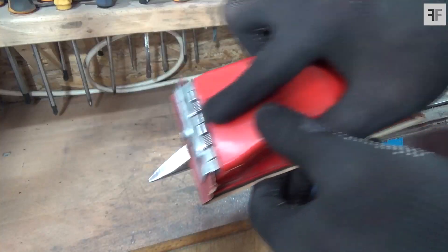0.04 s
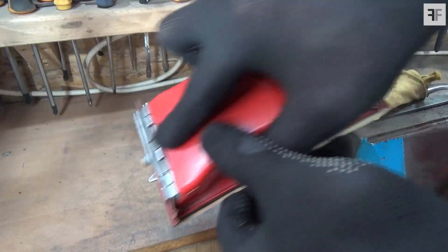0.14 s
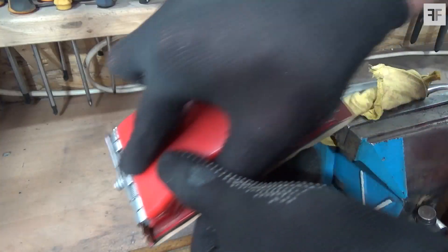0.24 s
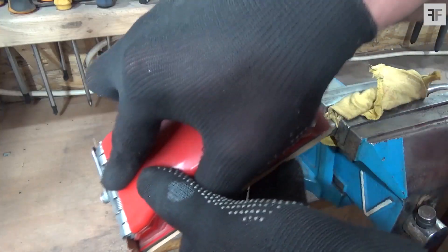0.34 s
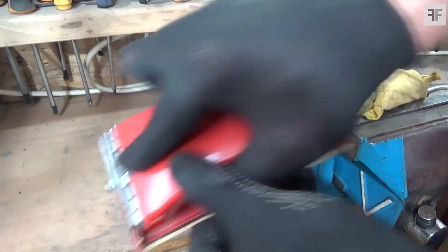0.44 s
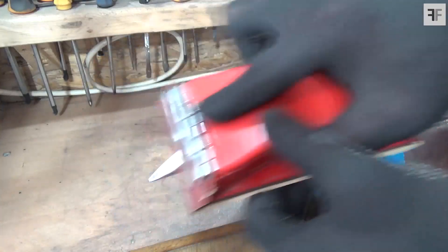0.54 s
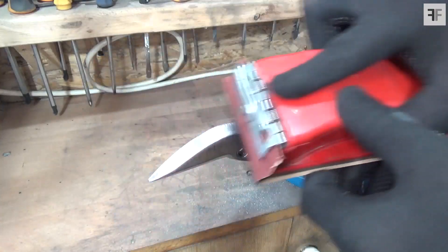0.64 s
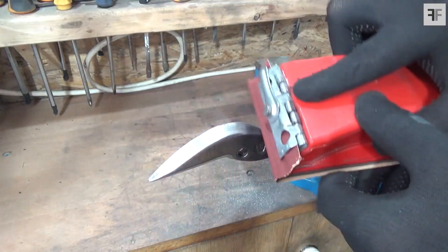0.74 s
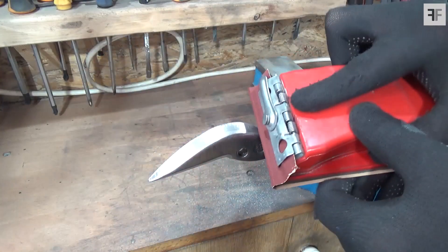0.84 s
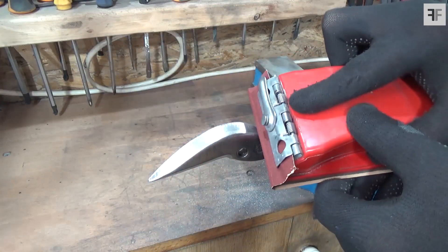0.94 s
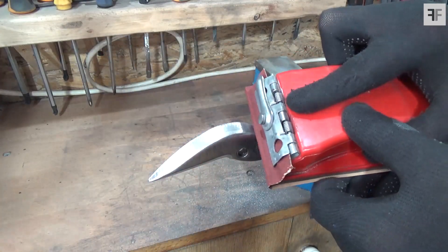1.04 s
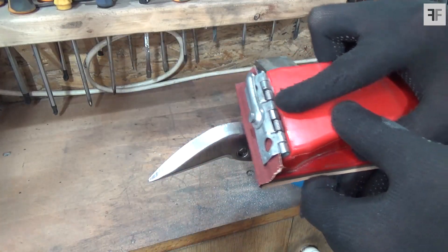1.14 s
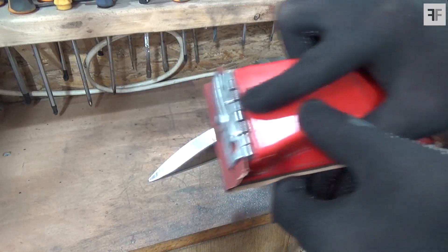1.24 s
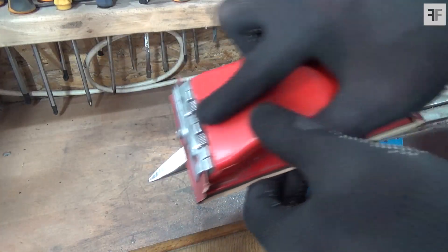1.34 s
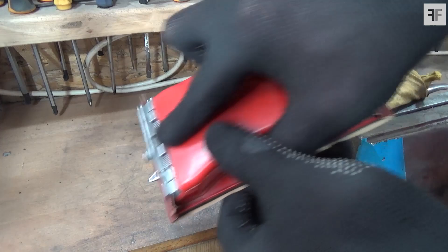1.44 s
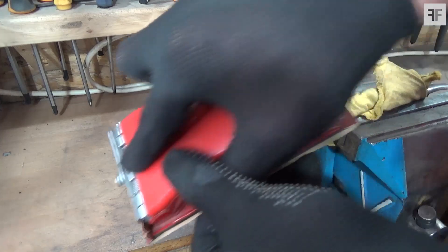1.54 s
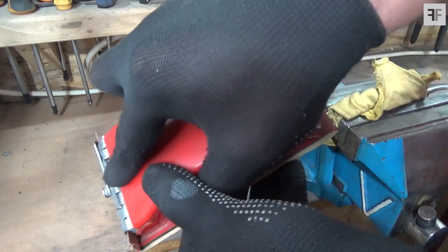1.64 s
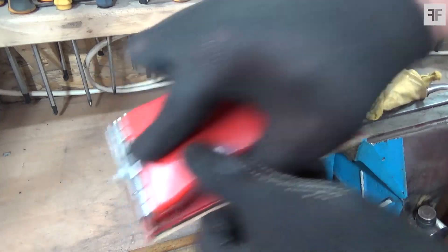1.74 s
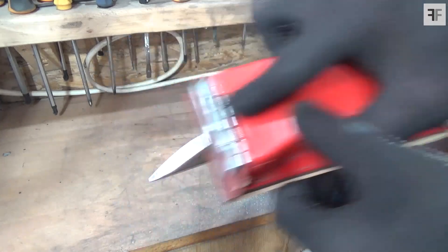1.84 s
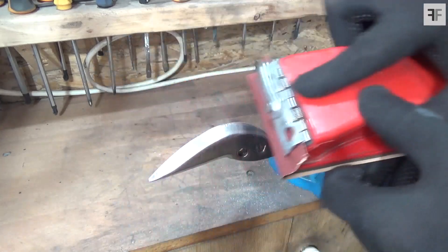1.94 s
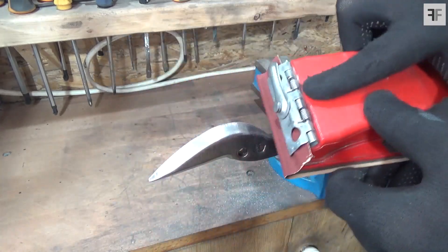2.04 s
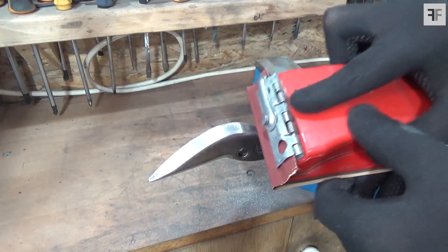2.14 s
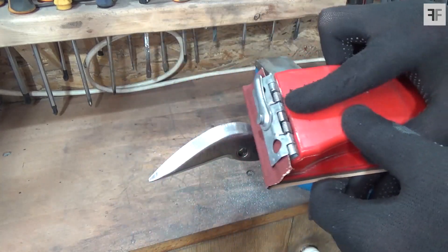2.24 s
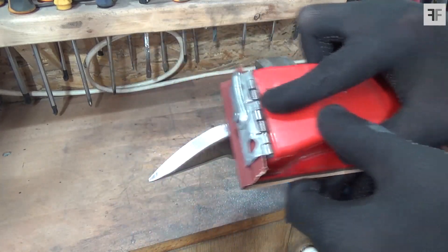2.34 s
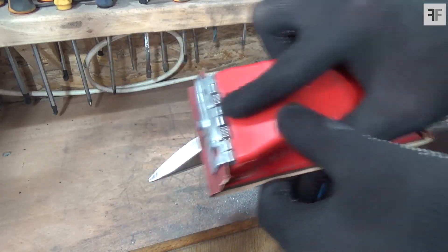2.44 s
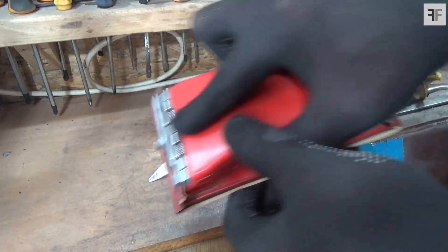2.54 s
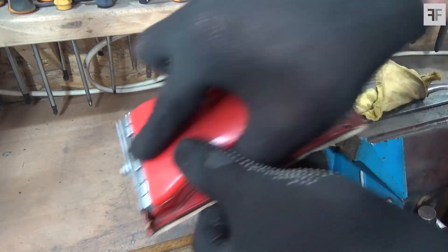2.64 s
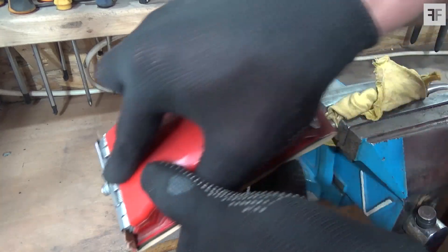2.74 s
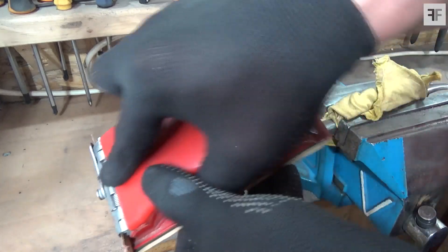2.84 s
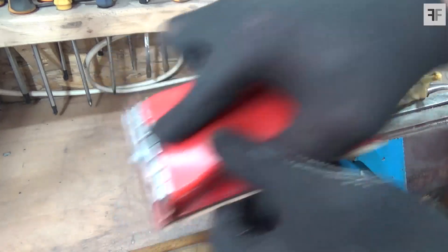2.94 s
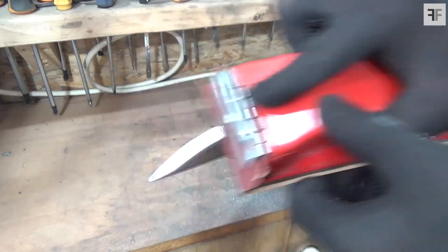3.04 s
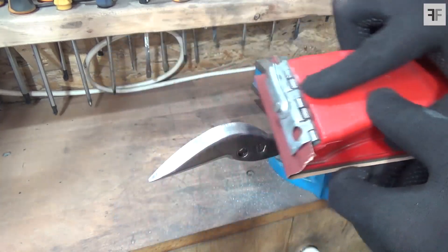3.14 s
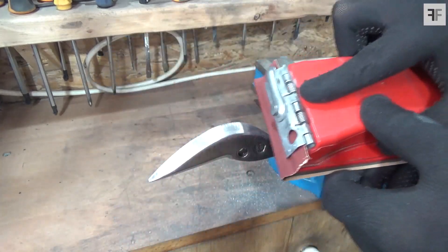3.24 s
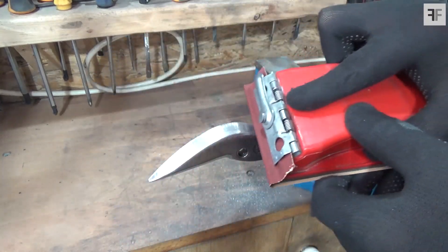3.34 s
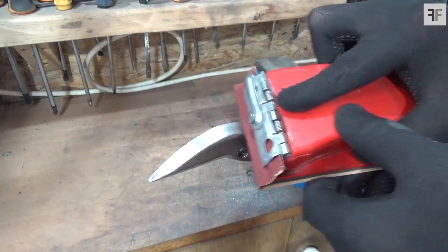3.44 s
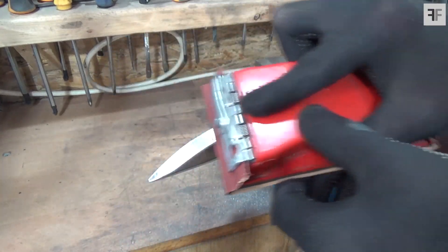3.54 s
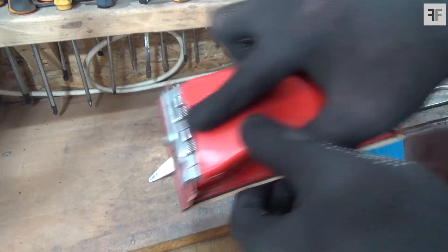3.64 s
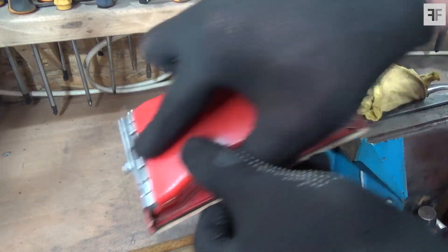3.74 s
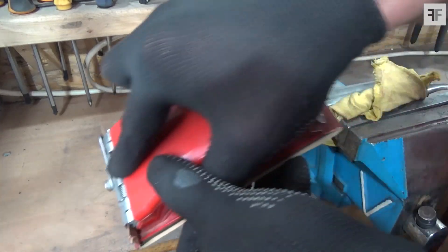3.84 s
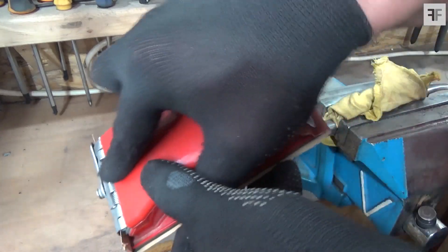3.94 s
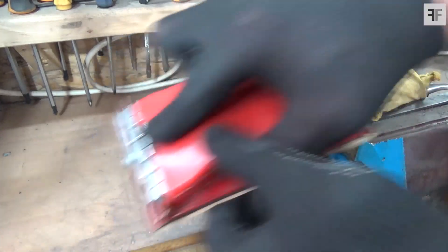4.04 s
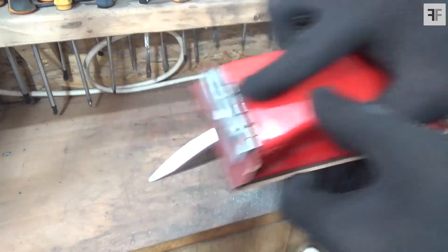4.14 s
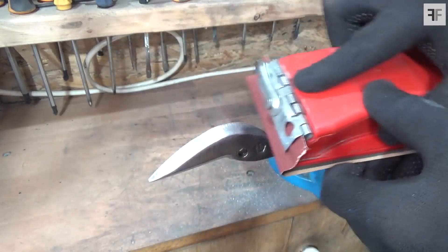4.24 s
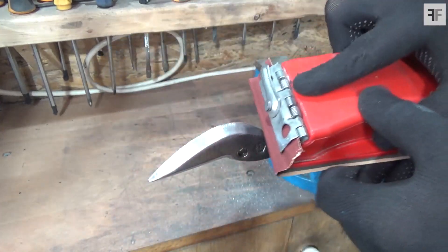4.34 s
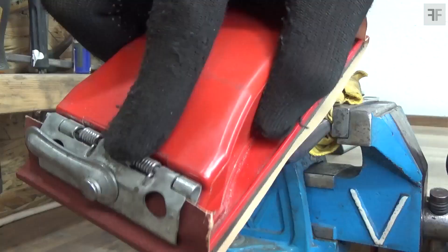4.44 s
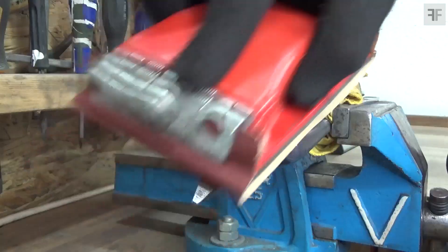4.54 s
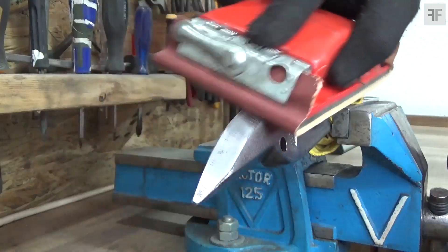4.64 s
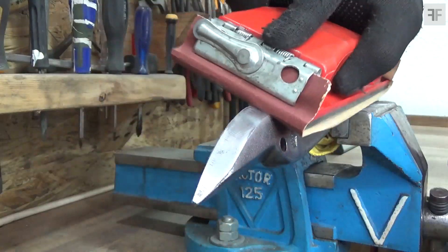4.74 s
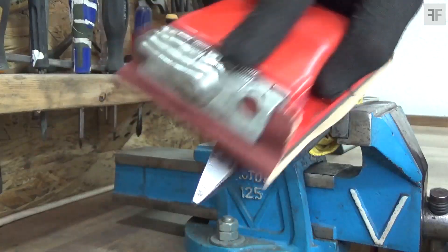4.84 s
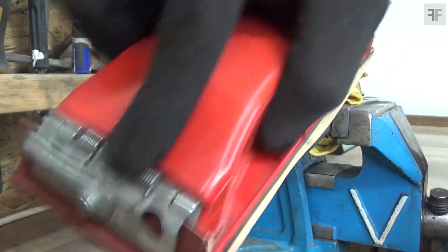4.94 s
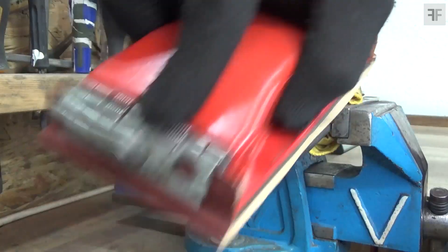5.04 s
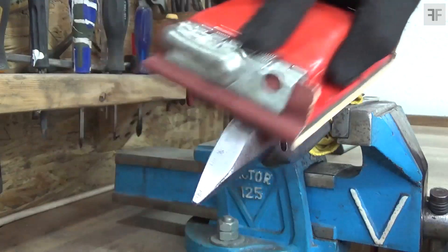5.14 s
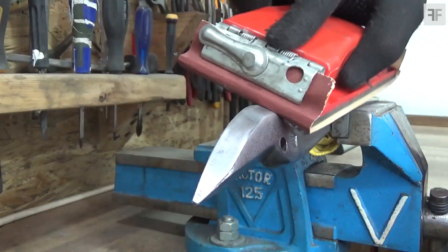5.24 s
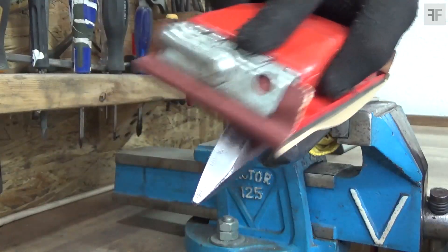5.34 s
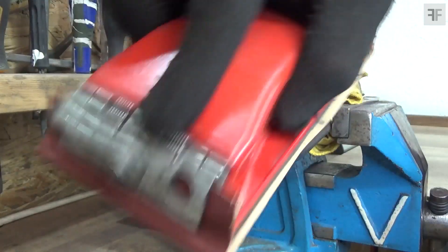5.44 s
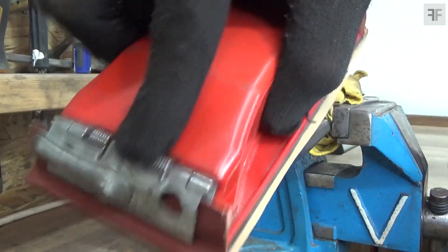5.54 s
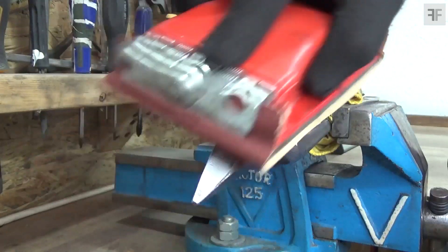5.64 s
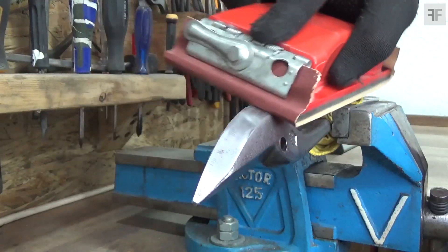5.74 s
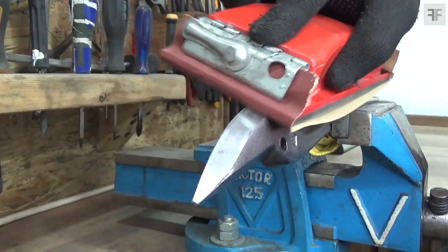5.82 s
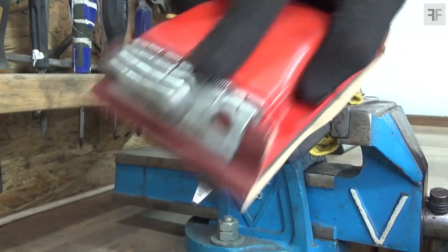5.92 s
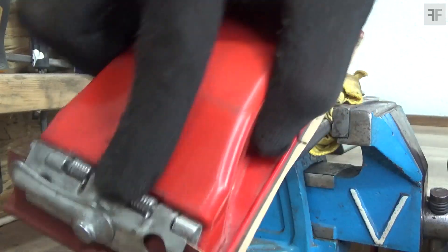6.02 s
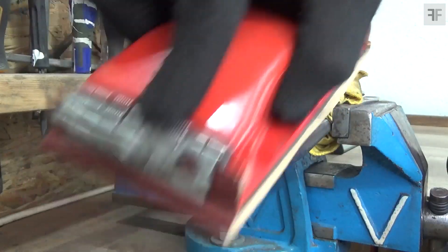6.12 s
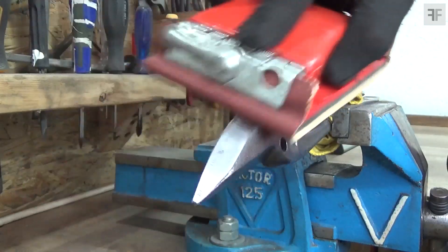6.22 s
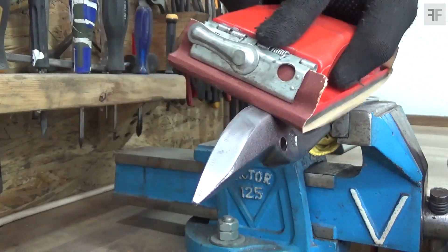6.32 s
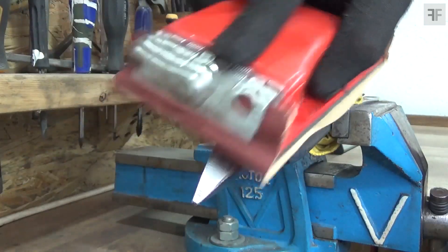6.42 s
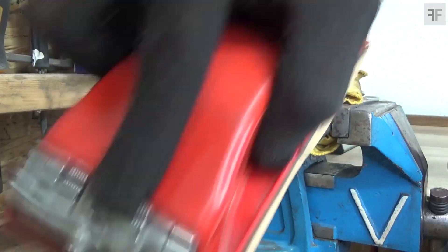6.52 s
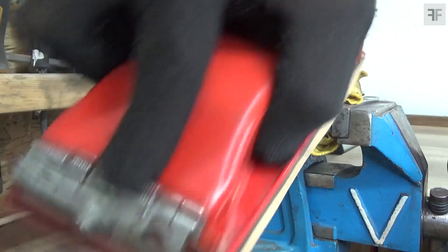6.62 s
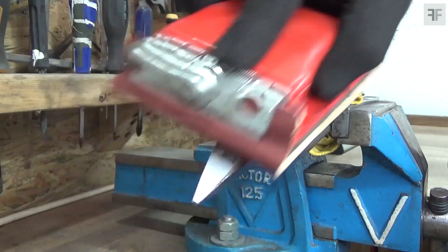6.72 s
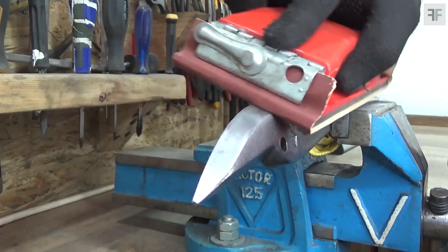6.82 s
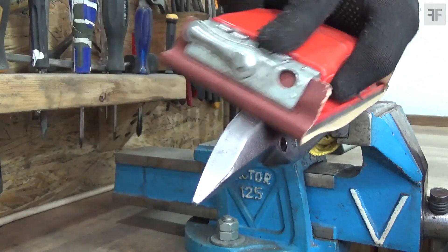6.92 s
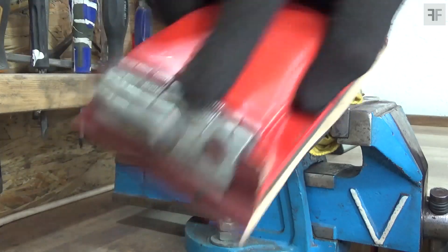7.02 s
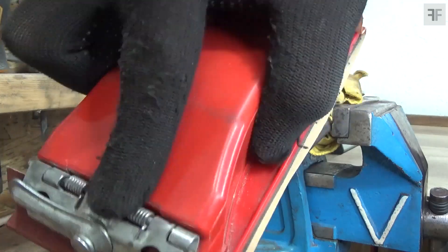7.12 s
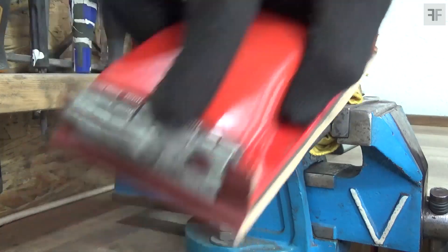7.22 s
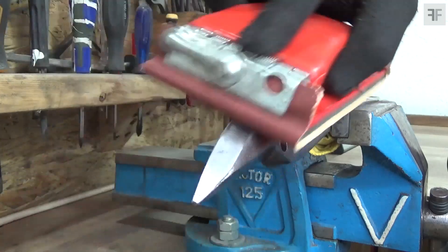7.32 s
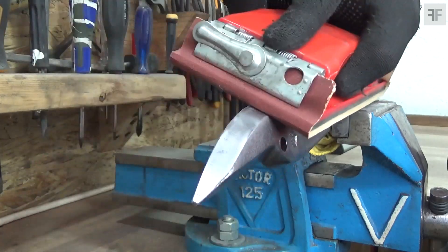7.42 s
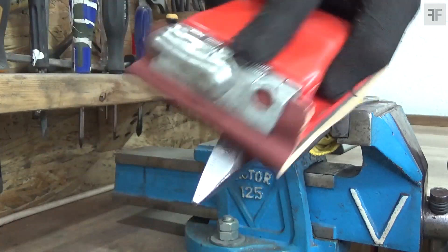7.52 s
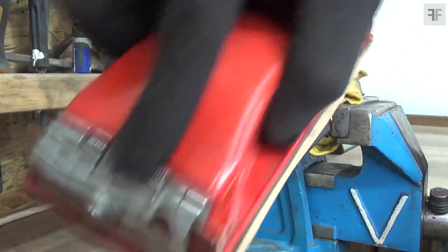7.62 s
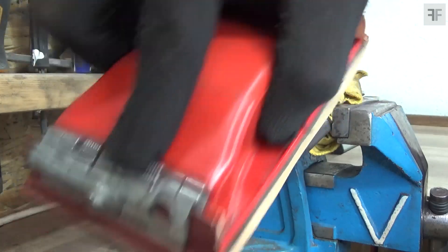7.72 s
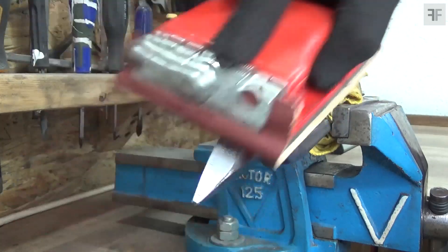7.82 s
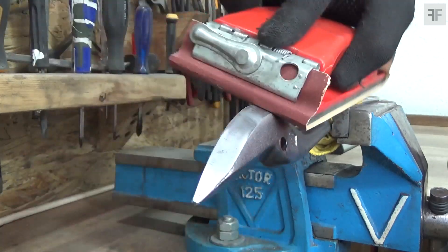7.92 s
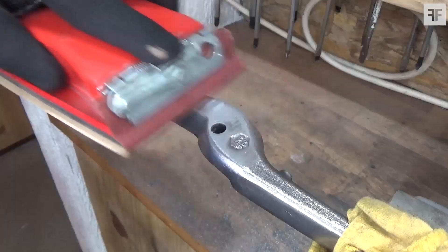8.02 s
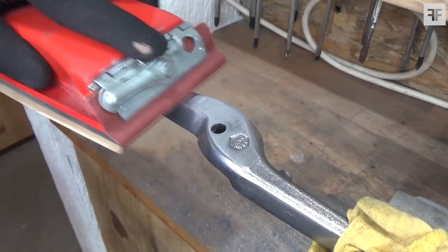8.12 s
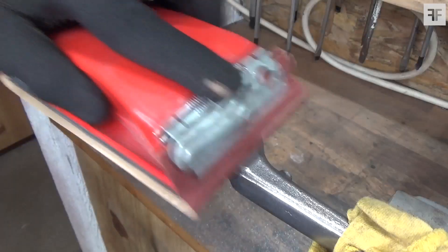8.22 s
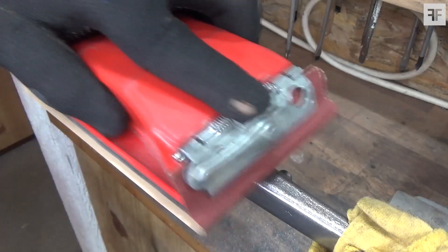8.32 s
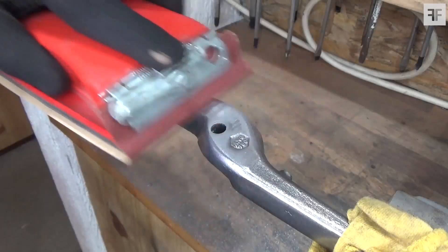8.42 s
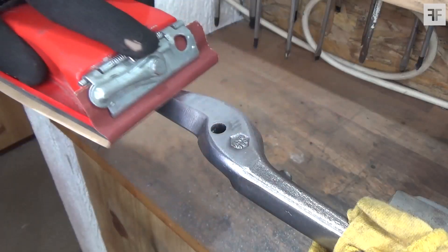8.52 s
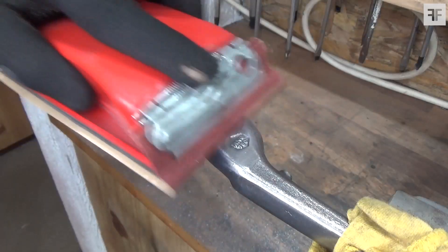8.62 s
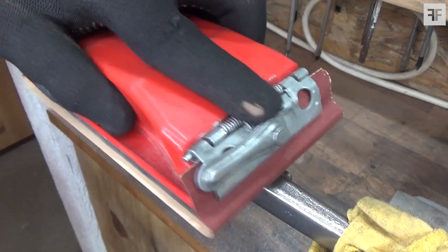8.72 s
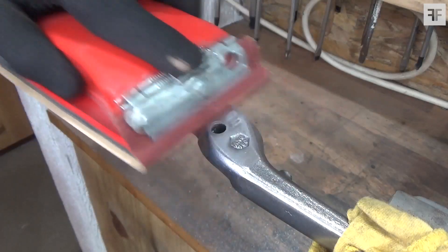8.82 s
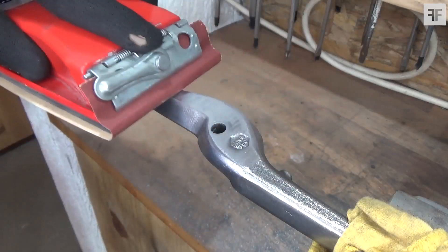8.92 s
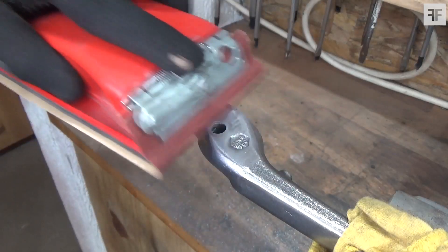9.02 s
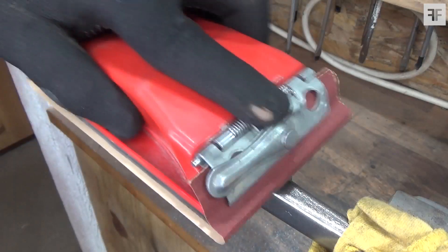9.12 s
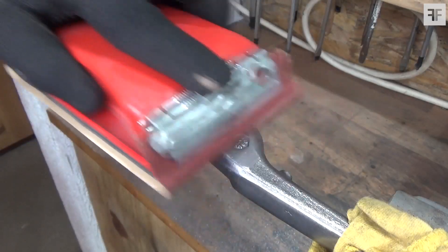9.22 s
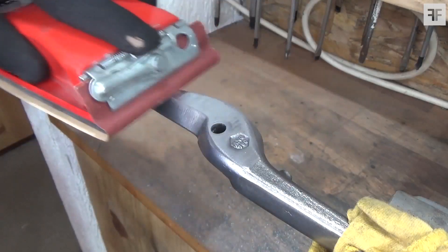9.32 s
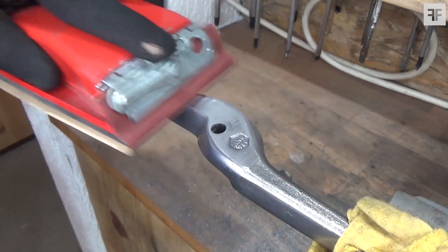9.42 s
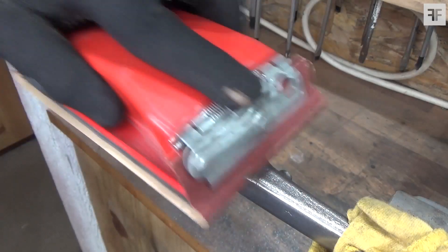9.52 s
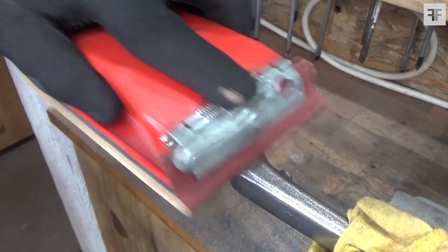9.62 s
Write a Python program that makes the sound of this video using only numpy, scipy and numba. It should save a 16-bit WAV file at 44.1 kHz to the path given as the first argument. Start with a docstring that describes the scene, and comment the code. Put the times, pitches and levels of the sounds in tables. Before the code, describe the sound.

Abrasive paper on a hollow plastic block scrapes bare steel, heard close with a short, dry room around it. Long bright hissing strokes with a hollow low hum near their ends alternate with quiet pauses, small knocks and paper ticks. After a few seconds the strokes join into rapid, regular to-and-fro scrubbing with metallic and papery resonances, nearly stopping at each turn, then speed up a little and continue to the end.

```python
"""Sanding a pruner blade

A plastic sanding block rasps on the steel blade of a pruner clamped in a vice, close up in a small workshop.
Four long pushes come first (one already under way), then quick to-and-fro strokes on the edge and on the neck.
Ticks and hiss of grit drive resonances of blade, block and paper, chosen by where the pad touches.
The hollow block hums on the long pushes; filtered noise makes dry knocks, rustling cloth and still air.
Scattered echoes add the room."""
import sys
import numpy as np
from scipy import signal
from scipy.fft import rfft, irfft, next_fast_len
from scipy.io import wavfile
from scipy.ndimage import uniform_filter1d, map_coordinates
from numba import njit

SR = 44100
rng = np.random.default_rng(int(sys.argv[2]) if len(sys.argv) > 2 else 0)


def to_wav(s):
    """Save 16-bit WAV."""
    ch = np.atleast_2d(s).T  # columns
    pcm = np.round(np.clip(ch, -1, 1) * 32767)  # PCM
    wavfile.write(sys.argv[1], SR, pcm.astype(np.int16))


N = 426447
TIME = np.arange(N) / SR  # s

# "place" is the contact point in the stroke: 0 to 1 along a push, 1 to 2 back along a return.

# Long pushes; force level at the bite:
# block_sets_off_s, pad_bites_s, lifts_off_s, rise_s, easing_s, level_db, treble_db
PUSHES = [(-0.245, -0.2, 0.462, 0.1, 0.07, -30.8, -1), (1.075, 1.04, 1.745, 0.125, 0.09, -31.5, -0.5),
          (2.2, 2.309, 2.91, 0.046, 0.12, -31.8, -0.5), (3.37, 3.37, 4.03, 0.165, 0.16, -31, -1)]
# Light brushes of the pad on the blade: start_s, length_s, peak_level_db
BRUSHES = [(0.91, 0.095, -59.5), (0.99, 0.07, -60), (1.773, 0.04, -52), (2.17, 0.12, -62),
           (2.238, 0.08, -42), (2.938, 0.052, -42.5), (3.305, 0.12, -57), (3.415, 0.045, -43),
           (4.16, 0.17, -65), (4.41, 0.13, -67)]
# Quick strokes, push and return in turn, each lasting until the next:
# start_s, braking_s, level_db, blade_ring_db, treble_db
EDGE_STROKES = [(4.558, 0.04, -33, 0, 0), (4.827, 0.042, -32.2, 0, 0), (5.076, 0.03, -32.2, 2, 0),
                (5.348, 0.045, -32.2, 1, 0), (5.622, 0.04, -33.3, -2, 0), (5.886, 0.03, -32.9, 0, 0),
                (6.152, 0.034, -33.2, 0, 0), (6.413, 0.028, -32.5, -1, 0), (6.678, 0.036, -32.4, -1, 0),
                (6.967, 0.03, -31.7, 0, 0), (7.234, 0.045, -33.4, -4, 0), (7.527, 0.036, -32.1, -1, 0),
                (7.785, 0.03, -33.4, -3, 0)]
NECK_STROKES = [(8.031, 0.043, -32, -1, 0), (8.188, 0.035, -32, -1, 0), (8.39, 0.045, -31.8, -1, 0),
                (8.606, 0.025, -32.2, 0, 0), (8.811, 0.055, -31.7, -1, 0), (9.027, 0.042, -31.5, 0, 0),
                (9.243, 0.045, -32, -1, 0), (9.455, 0.037, -31.2, 0, 0)]
# Timing shared by all pushes (first row) and all returns (second row): rise_s, rest_before_next_s
EDGE_TIMING = [(0.026, 0.006), (0.013, 0)]
NECK_TIMING = [(0.022, 0), (0.021, 0)]
# Broad colour of the rubbing: frequency_hz, level_db
FLAT_COLOUR = [(30, -46.5), (100, -43), (185, -25.5), (480, -14), (780, -10.5), (1050, -7.5), (1400, -4.5),
               (2000, -2), (3200, -2.5), (4700, -2), (7500, 1), (10000, -4), (13000, -9.5), (15800, -17.5)]
EDGE_COLOUR = [(30, -48), (65, -41), (105, -45), (180, -25), (450, -13), (760, -14.5), (1050, -2),
               (1450, -5.5), (2000, -3), (3300, 1.5), (4800, 1), (7500, -0.5), (10000, -6), (13000, -12.5),
               (15800, -18)]
NECK_COLOUR = [(30, -55), (90, -48), (180, -30.5), (450, -17), (760, -13.5), (1100, -8.5), (1450, -13.5),
               (2000, -3.5), (3300, -3), (4800, 0), (8000, 1), (10000, -3.5), (13000, -10.5), (15800, -20)]
# Keenness of the paper along the pad, for each way of holding it: place, treble_db
PAD_KEENNESS = [(0, -1), (.29, -9), (.4, 5.5), (.55, -2), (.7, -5), (.85, -18), (1, 1)]
EDGE_KEENNESS = [(0, 5), (.38, 6.5), (.62, 13.5), (.9, 7), (1.1, 5.5), (1.55, 4), (2, 5)]
NECK_KEENNESS = [(0, 1), (.8, 2.5), (1.05, -6), (1.5, 3), (2, 0)]
# Resonances of blade and block: pitch_hz, width_hz, lift_db, best_place, reach_in_place
FLAT_MODES = [(185, 30, 3, .75, .4), (990, 170, 7, 0.19, 0.35), (1155, 33, 13.5, 0.85, 0.25),
              (1225, 65, 14.5, 0.72, 0.42), (1790, 190, 11.5, 0.6, 0.36), (2260, 140, 6, 0.74, .25),
              (2735, 130, 12, 0.5, 0.38), (3370, 390, 3, 0.42, 0.3), (3950, 200, -1, 0.5, 0.25),
              (3720, 150, 7, 0.16, 0.11), (6230, 260, 3, 0.44, 0.16), (9250, 410, -2, 0.64, 0.43)]
EDGE_MODES = [(338, 36, 14, 0.95, 0.3), (643, 32, 20, 0.45, 0.95), (865, 46, 14.5, 1.12, 0.18),
              (1290, 300, 14.5, 0.13, 0.097), (1170, 370, 13.5, 1.906, 0.16), (1740, 92, 12.5, 1.5, 0.7),
              (1947, 140, 12.5, 1.64, 0.63), (2320, 196, 11, 1.79, 0.69), (2910, 87, 3, 0.12, 0.37),
              (7400, 690, 1, 1.74, 0.22), (3220, 1100, 9, 1.04, 0.05), (3880, 460, 8, 0.78, 0.22),
              (5970, 500, 1, 1.1, 1.2), (7050, 700, 0, 0.8, 3)]
NECK_MODES = [(335, 55, 3.5, 1.2, 1.3), (632, 45, 18.5, 0.88, 0.36), (885, 80, 11, 1.12, 0.18),
              (1170, 106, 3.5, 0.46, 1.7), (1790, 200, 11.5, 1.86, 0.18), (2480, 140, 7, 1.12, 0.4),
              (3030, 160, 1.5, 0.5, 0.83), (4450, 560, 6, 1.16, 0.17), (5650, 200, 9, 1.05, 0.5),
              (5930, 500, 6.5, 1.4, 1.3), (8300, 2600, 0, 0.42, 0.2)]
# Pad resonances sliding with the length beyond the contact, one list for each: place, pitch_hz, lift_db
FLAT_SLIDES = [
    [(0, 5900, -12), (.15, 5900, 2), (.21, 5850, 5.5), (.26, 5000, 6.5), (.3, 4400, 2), (.38, 4000, -14),
     (1, 4000, -30)],
    [(0, 3800, -12), (.19, 3700, 1), (.26, 3350, 8), (.3, 2850, 13), (.39, 2740, 9), (.5, 2600, -8),
     (.75, 1630, -20), (.88, 1100, 12), (1, 1000, -5)],
]
EDGE_SLIDES = [
    [(0, 2260, -20), (.15, 2400, 17), (.3, 940, -1), (.55, 634, -30), (.95, 520, 19), (1.1, 650, 9),
     (1.2, 900, -18), (1.5, 1130, 6), (1.7, 1700, -8), (1.9, 1760, 28), (2, 1800, 8)],
]
NECK_SLIDES = [
    [(0, 1800, 11), (.3, 1090, -8), (.75, 630, -1), (1, 620, 9), (1.2, 860, 12), (1.45, 1030, 14),
     (1.6, 1300, 9), (1.75, 1700, 4), (2, 1900, 12)],
]
# Spans of paper singing along with the grit: mid_stroke_pitch_hz, lift_db, glide_per_stroke (natural log of ratio)
FLAT_SPANS = [(3100, -9, -.2), (5750, -5, .45), (7500, -2, .3), (9300, -7, .2)]
EDGE_SPANS = [(3000, -8, .25), (4600, -7, .2), (5650, -4, -.15), (6400, -2, -.18), (7150, -2, -.15),
              (8400, -7, -.17), (10800, -5, .15)]
NECK_SPANS = [(3300, -10, .15), (5900, -8, -.06), (6600, -6, -.12), (7900, -6, -.12), (9300, -7, -.12),
              (11800, -5, .12)]
# Hum of the hollow block against the rubbing force: place, level_db
BOOM_DRIVE = [(0, -23), (.09, -19), (.2, -32), (.55, -34), (.72, -26), (.83, -14.5), (.9, -17), (1, -25)]
# Knocks of the block on the blade and snaps of its paper: start_s, peak_db, body_hz, ring_db, decay_s
TAPS = [(0.508, -45, 2000, 0, .003), (0.773, -42, 4200, 0, .002), (0.915, -37, 6500, 0, .003),
        (1.032, -43, 7500, 3, .0026), (1.047, -35, 7500, 5, .0026), (1.057, -35, 7500, 5, .0026),
        (1.073, -30, 7360, 3, .0026), (1.093, -27.5, 5970, 3, .0026), (1.753, -32, 2500, 0, .003),
        (1.98, -48, 2210, 3, .0026), (2.24, -33, 3620, 3, .0026), (3.116, -53, 5000, -3, .0026),
        (3.137, -57, 4500, 0, .002), (3.341, -45, 1950, 3, .0026), (3.399, -35.5, 1250, 3, .003),
        (4.175, -45, 7420, 3, .0026), (4.191, -38, 2340, 8, .003), (4.204, -38, 2840, 6, .0026),
        (4.213, -40, 2600, 6, .003), (4.247, -50, 900, 24, .002), (4.254, -44, 1550, 20, .002),
        (4.342, -43, 3530, 14, .0018), (4.508, -28, 5500, 8, .001), (4.524, -28, 1650, 9, .004),
        (5.342, -25, 7150, 8, .0026), (9.467, -24, 4600, 5, .0026)]
# Gloves and sleeves rustling as the block is carried back: start_s, length_s, peak_level_db
RUSTLES = [(0.45, 0.25, -73), (0.84, 0.26, -74), (1.78, 0.5, -75), (3.23, 0.24, -66), (4.1, 0.5, -68.5)]
# Colour of the cloth: frequency_hz, level_db
CLOTH = [(30, -45), (100, -36), (200, -14), (430, 1), (700, 0), (1400, -6), (3000, -16), (15800, -40)]
# Colour of the still workshop air: frequency_hz, level_db
AIR = [(30, -24), (100, -14), (200, 0), (420, 4), (700, 3), (2000, -3), (5000, -7), (8500, -6),
       (12000, -19), (15800, -37)]

EDGE_END_S, NECK_END_S = 8.044, 9.679


def undb(db):
    """Decibels to gain."""
    return 10 ** (np.asarray(db) / 20)


def unit(x):
    """Scale to rms 1."""
    return x / np.sqrt(np.mean(x ** 2))


def follow(table, at):
    """Read each further column of a table, joined by straight lines along its first."""
    key, *columns = np.transpose(table)
    return [np.interp(at, key, column) for column in columns]


def colour(x, points):
    """Filter by a spectrum of (Hz, dB) points, joined on a logarithmic pitch scale."""
    length = x.shape[-1]
    size = next_fast_len(length)
    hz, db = np.transpose(points)
    bins = np.maximum(np.fft.rfftfreq(size, 1 / SR), 1)
    gain = undb(np.interp(np.log(bins), np.log(hz), db))
    return irfft(rfft(x, size) * gain, size)[..., :length]


@njit
def svf(x, g, k):
    """State-variable band-pass, gain 1 at the centre."""
    y, band, low = np.empty(len(x)), 0., 0.
    for i in range(len(x)):
        v = (band + g[i] * (x[i] - low)) / (1 + g[i] * (g[i] + k[i]))
        band = 2 * v - band
        low = low + 2 * g[i] * v
        y[i] = k[i] * v
    return y


def ring(x, hz, width):
    """A resonance whose centre and width (Hz) may move."""
    ones = np.ones(len(x))
    return svf(x + 1e-18, np.tan(np.pi * hz / SR) * ones, width / hz * ones)


def walk(t, rate):
    """Random wander of spread near 1, heading for a new value rate times a second."""
    return unit(np.interp(t * rate, np.arange(N // 10), rng.standard_normal(N // 10)))


def long_pushes(force, place):
    """The whole length of the pad slides along the flat of the blade."""
    during = TIME < EDGE_STROKES[0][0]
    t, force, place = TIME[during], force[during], place[during]
    full_speed_db = -35  # force level at which the pad counts as running at full speed
    speed = np.minimum((force / undb(full_speed_db)) ** .45, 1)
    treble_db = follow(PAD_KEENNESS, place)[0] + follow(PUSHES, t)[-1]
    sound = rub(t, speed, place, treble_db, 0, FLAT_COLOUR, FLAT_MODES, FLAT_SLIDES, FLAT_SPANS,
                slide_width=.18)
    return np.pad(sound * force, (0, N - len(t)))


def push_motion():
    """Force and place of the block: each push bites, sags, eases and lifts off, with light brushes between."""
    sag_db_per_s, ease_db = 2.5, 8.5  # the pressure sinks slowly, then eases before the lift
    lift_s, trail_s, trail_db = 0.019, 0.08, -17  # the pad leaves the steel; its loose paper trails on
    lift_place, overrun_s = 0.89, 0.08  # the block runs on a little before it is carried back
    handling_db = -81  # rustle of the block in the hand
    force, path = np.zeros(N), []
    for start, bite, lift, rise, ease, db, _ in PUSHES:
        grip = np.clip((TIME - bite) / rise, 0, 1) ** 1.5
        easing = np.clip((TIME - lift) / ease + 1, 0, 1) ** 1.4
        lifted = np.maximum(TIME - lift, 0)
        contact = np.maximum(np.exp(-lifted / lift_s), undb(trail_db) * np.exp(-lifted / trail_s))
        pressure_db = db - sag_db_per_s * (TIME - bite) - ease_db * easing
        force += grip * contact * undb(pressure_db)
        path += [(start, 0), (lift, lift_place), (lift + overrun_s, 1)]
    for start, length, db in BRUSHES:
        force += undb(db) * np.interp((TIME - start) / length, [0, .3, 1], [0, 1, 0])
    return np.hypot(force, undb(handling_db)), follow(path, TIME)[0]


def quick_strokes(strokes, end_s, timing, keenness, broad, modes, slides, spans, first_place, creep_db):
    """The pad stays on the steel, bites, runs, and all but stops at each turn."""
    turns = [row[0] for row in strokes] + [end_s]
    during = (TIME >= turns[0]) & (TIME < end_s)
    t, out = TIME[during], np.zeros(N)
    speed, force, ring_db, treble_db = np.zeros((4, len(t)))
    for k, (start, braking, db, ringing, treble) in enumerate(strokes):
        rise, rest = timing[k % 2]
        bite = np.clip((t - start) / rise, 0, 1)
        brake = np.clip((turns[k + 1] - rest - t) / braking, 0, 1)
        speed += bite * brake
        ring_db += ringing * bite * brake
        treble_db += treble * bite * brake
        force += undb(db) * bite ** 1.76 * brake ** 1.07
    # no two strokes take quite the same path
    travelled = np.interp(t, turns, [first_place, *range(1, len(turns))])
    place = (travelled + 0.038 * speed * walk(t, 6)) % 2
    treble_db += speed * follow(keenness, place)[0]
    sound = rub(t, speed, place, treble_db, ring_db, broad, modes, slides, spans, slide_width=0.059)
    out[during] = sound * np.hypot(force, undb(creep_db))
    return out


def rub(t, speed, place, treble_db, ring_db, broad, modes, slides, spans, slide_width):
    """Grit through the resonances that the contact point excites, held at an even loudness."""
    scrape = colour(grit(t, speed, catches_per_s=3000, hiss=2.4), broad)
    # a faster pad cuts more sharply, and no two patches of paper are equally keen
    speed_db = np.maximum(14 * (speed - 1), -7)
    keen_db = treble_db + speed_db + .5 * walk(t, 35) + 0.28 * walk(t, 13)
    treble = colour(scrape, [(1500, -40), (4000, -16), (8000, -6), (12500, -2)])
    scrape = scrape + treble * (undb(keen_db) - 1)
    out = scrape.copy()
    for hz, width, db, best_place, reach in modes:
        away = (place - best_place + 1) % 2 - 1  # shortest way round the to-and-fro cycle
        grip_db = ring_db + 1.6 * walk(t, 14)  # the hand never damps it twice alike
        out += undb(db + grip_db) * np.exp(-(away / reach) ** 2) * ring(scrape, hz, width)
    # the pad's resonances come in fits
    for slide in slides:
        pad_hz, pad_db = follow(slide, place)
        pad_hz = pad_hz * (1 + 0.014 * walk(t, 45))
        out += undb(pad_db + 2.2 * walk(t, 70)) * ring(scrape, pad_hz, slide_width * pad_hz)
    # spans of paper glide one way on the push and back on the return, fluttering as they go
    along = .5 - np.abs(place - 1)
    for hz, db, glide in spans:
        span_hz = hz * np.exp(glide * along + .035 * np.tanh(walk(t, 4)))
        flutter_db = 5 * np.tanh(walk(t, 28))
        out += undb(db + flutter_db) * ring(out, span_hz, .035 * hz)
    out = glances(out, t, place, echo_db=-16, count=4)
    # the rubbing is held at an even loudness, whichever resonances ring
    power = uniform_filter1d(uniform_filter1d(out ** 2, size=700), size=700)
    out /= np.sqrt(np.abs(power) + 1e-12)
    # the paper sticks and slips, most of all when slow
    return out * undb(1.85 * (1.5 - speed) * walk(t, 110))


def grit(t, speed, catches_per_s, hiss):
    """Grains catch and let go: ticks stand out when the pad creeps, an even hiss takes over when it runs."""
    chance = catches_per_s / SR
    ticks = (rng.random(len(t)) < chance) * rng.standard_normal(len(t))
    return unit(ticks) + hiss * (speed + 0.45) * rng.standard_normal(len(t))


def glances(x, t, place, echo_db, count):
    """Echoes from hands, vice and bench, whose paths change as the block travels."""
    out, index = x.copy(), np.arange(len(t))
    travel = np.cos(np.pi * place) + 0.24 * walk(t, 5)
    for lag_s, swing in zip(np.linspace(.0022, .0068, count), rng.uniform(-1.1, 1, count)):
        lag = (lag_s * rng.uniform(.85, 1.4) + 0.000342 * swing * travel) * SR  # samples
        out += undb(echo_db) * map_coordinates(x, [index - lag], order=3)
    return out


def boom(force, place):
    """The hollow of the block hums, most with an end of the pad on the blade, and dies away after the lift."""
    drive = rng.standard_normal(N)
    sag = 1 - .25 * np.clip(place - .75, -.15, .1)  # two of the pitches sink late in the push
    pair = ring(drive, 340, 23) + .7 * ring(drive, 365 * sag, 45)
    hum = unit(ring(pair, 325 * sag, 80))
    driven_db = 20 * np.log10(force) + follow(BOOM_DRIVE, place)[0]
    # it swells at once but fades by 150 dB a second at most
    fade_db = 150 * TIME
    return hum * undb(np.maximum.accumulate(driven_db + fade_db) - fade_db)


def taps():
    """Short dry knocks: a crack, a ring of the block and a faint rattle of its clamp."""
    out, t = np.zeros(N), TIME[:SR // 10]
    for s, db, hz, ring_db, decay in TAPS:
        rattle = 0.1 * np.exp(-t / 0.03) * undb(2 * walk(t, 290))
        crack = rng.standard_normal(len(t)) * (np.exp(-t / decay) + rattle)
        # the lower the ring, the softer the blow and the duller its crack
        knock = ring(ring(crack, np.sqrt(3600 * hz), 13000), 2500, 17500)
        knock = knock + undb(ring_db) * ring(knock, hz, .08 * hz)
        i = int(s * SR)
        out[i:i + len(t)] += knock / np.abs(knock).max() * undb(db)
    return out


def rustles():
    """Soft, uneven swells of cloth: coloured noise under slow rises and falls."""
    swell = np.zeros(N)
    for start, length, db in RUSTLES:
        swell += undb(db) * np.interp((TIME - start) / length, [0, .4, 1], [0, 1, 0])
    cloth = unit(colour(rng.standard_normal(N), CLOTH))
    return cloth * swell * undb(2.2 * walk(TIME, 35))


def workshop(x, t60_s, wet_db, spread_db):
    """Bench and walls answer within a short tail, heard a little differently at left and right."""
    t = TIME[:SR // 2]

    def scatter(t60):
        """The sound scattered into a dying cloud of echoes."""
        tail = np.exp(-np.log(1000) * t / t60) * (t > .002) * rng.standard_normal(len(t))
        return signal.fftconvolve(x, tail / np.linalg.norm(tail))[:N]

    tail_colour = [(100, 38), (200, 25), (500, 1.5), (7000, -1.5), (11000, 8.5), (15000, -18)]
    side_colour = [(40, -6), (130, -19), (330, -10.5), (650, -3.5), (2500, 2), (4000, -4), (6000, -2),
                   (9500, 0), (11500, -33), (15000, -29)]
    turn = walk(TIME, 4)  # the near echoes shift as the hands move
    near = np.cos(turn) * scatter(0.021) + np.sin(turn) * scatter(0.021)
    side = colour(undb(wet_db) * scatter(t60_s) + undb(spread_db) * near, side_colour)
    middle = x + undb(wet_db) * colour(scatter(t60_s), tail_colour)
    return middle + side * np.array([[1], [-1]])


def still_air():
    """The quiet room: steady noise in the colour of the workshop air, the same on both sides."""
    return unit(colour(rng.standard_normal(N), AIR)) * undb(-78.5)


def scene():
    """Three ways of sanding, one after the other, in a quiet room."""
    force, place = push_motion()
    flat = long_pushes(force, place)
    edge = quick_strokes(EDGE_STROKES, EDGE_END_S, EDGE_TIMING, EDGE_KEENNESS, EDGE_COLOUR, EDGE_MODES,
                         EDGE_SLIDES, EDGE_SPANS, first_place=0, creep_db=-51)
    neck = quick_strokes(NECK_STROKES, NECK_END_S, NECK_TIMING, NECK_KEENNESS, NECK_COLOUR, NECK_MODES,
                         NECK_SLIDES, NECK_SPANS, first_place=.3, creep_db=-49.5)
    dry = flat + edge + neck + boom(force, place) + taps() + rustles()
    return workshop(dry, t60_s=0.29, wet_db=-17.5, spread_db=-13.5) + still_air()


def record(dry):
    """Little deep bass, and nothing above 15850 Hz."""
    thin = colour(dry, [(30, -7), (60, -7), (100, -9), (150, -1), (220, 0)])
    return signal.sosfilt(signal.ellip(10, .2, 70, 15850, fs=SR, output="sos"), thin)


dry = scene()
out = record(dry)
to_wav(out)
```